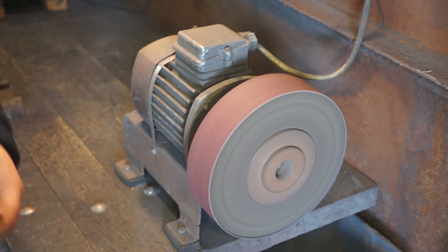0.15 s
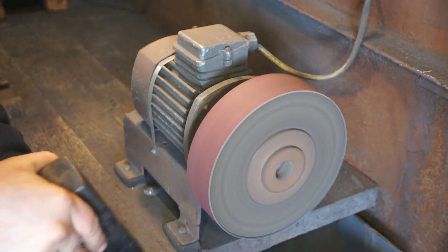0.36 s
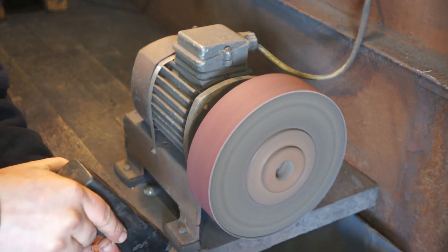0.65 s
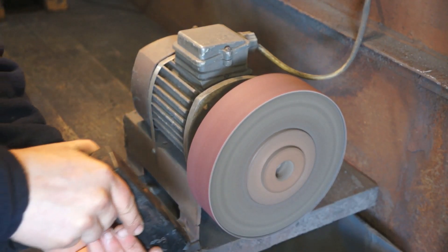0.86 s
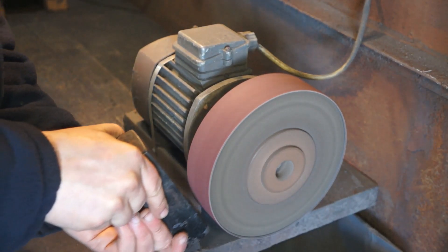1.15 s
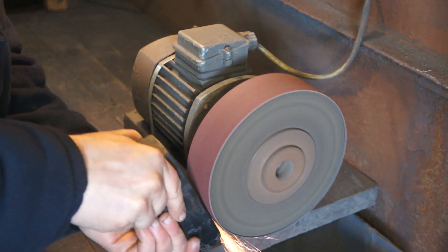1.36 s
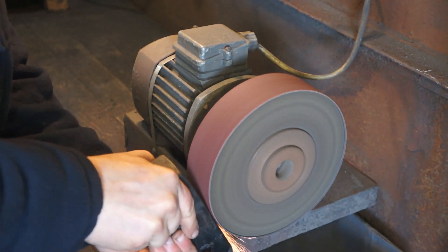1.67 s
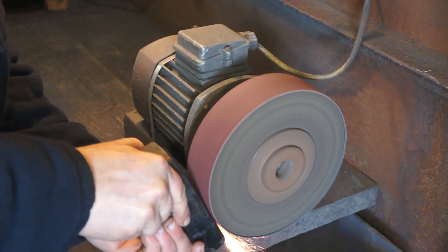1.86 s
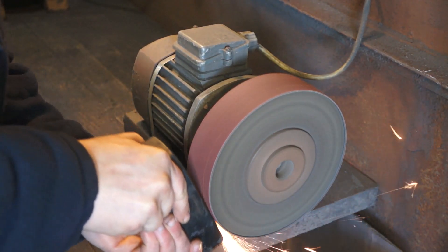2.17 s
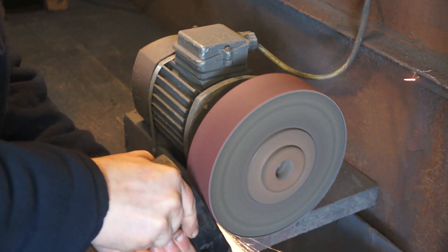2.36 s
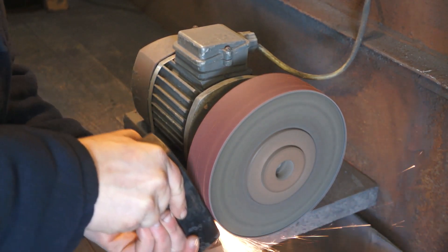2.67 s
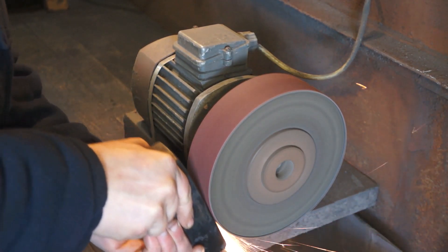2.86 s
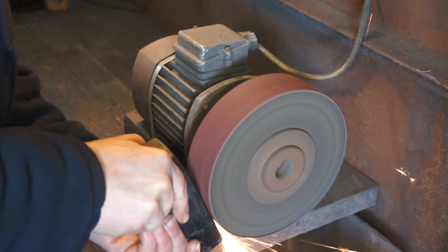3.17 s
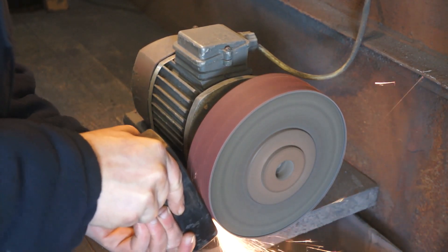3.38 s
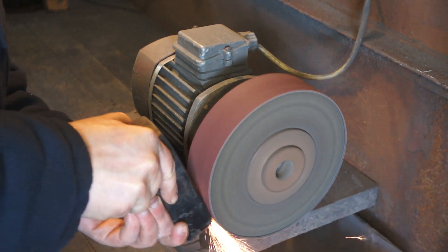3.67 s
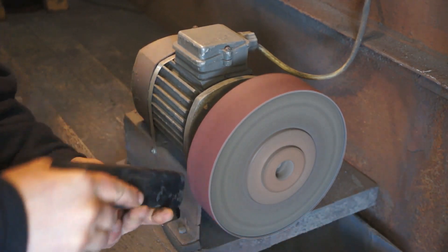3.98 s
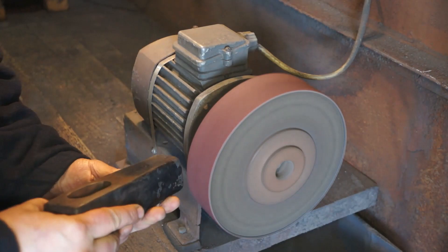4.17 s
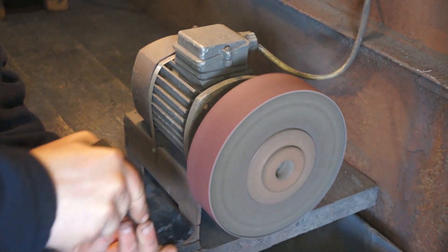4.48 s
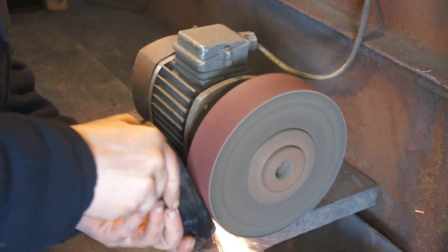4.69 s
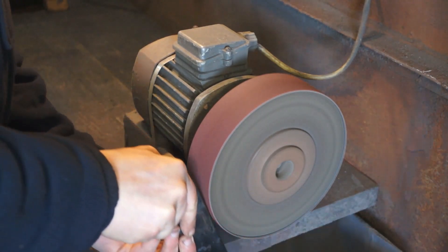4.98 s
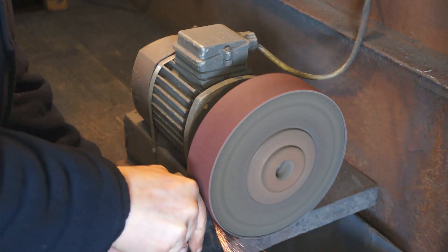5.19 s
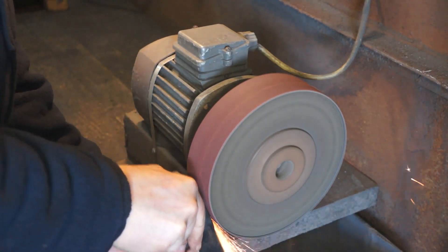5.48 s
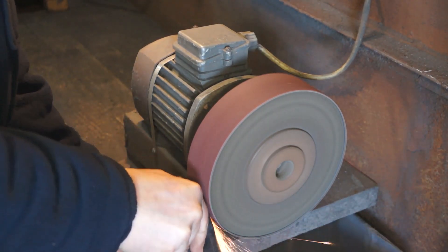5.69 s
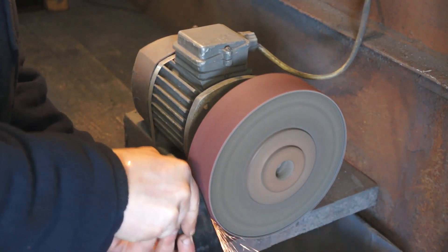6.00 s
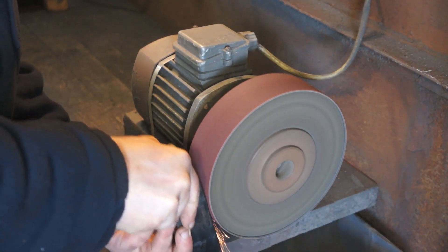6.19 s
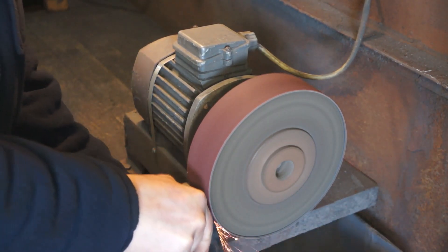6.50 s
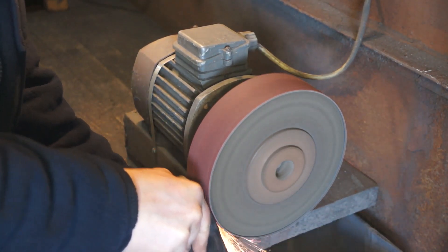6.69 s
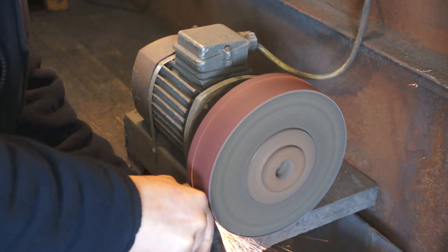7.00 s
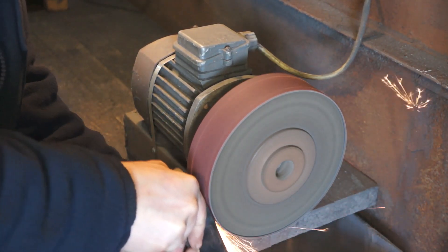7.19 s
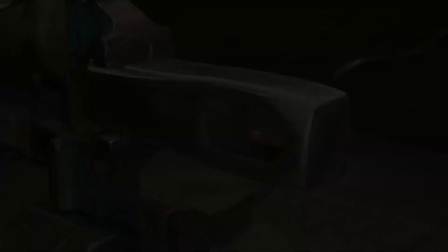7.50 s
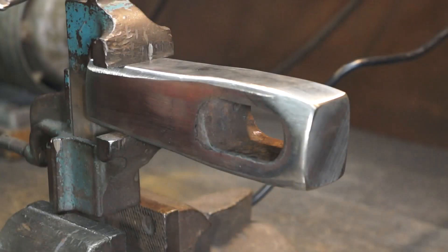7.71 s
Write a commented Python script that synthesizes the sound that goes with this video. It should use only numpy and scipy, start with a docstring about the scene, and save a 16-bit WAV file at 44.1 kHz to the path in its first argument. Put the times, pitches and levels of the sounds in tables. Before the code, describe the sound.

From 0 to 1.1 seconds an electric motor runs freely, close to the microphone: a steady low-mid hum, ball-bearing whine and rough housing rattle fluttering about fifty times a second. At 1.1 steel touches the spinning abrasive wheel, bouncing for a tenth of a second, then grinds until 3.67. The sound becomes a bright, dense hiss with metallic ringing around 4 to 7 kilohertz, gritty scrape, fine sharp ticks and a rapid buzz; pressure swells repeatedly and the motor slows slightly, mostly masked. The steel lifts, leaving the softer motor whir until 4.5. A second spell follows, less even, with short presses, lighter gaps around 5.2 to 6.8 and passing high squeals. A short, diffuse room tail surrounds the grinding. From 7.3 everything fades nearly to silence by 7.77, when a handheld die grinder abruptly chatters on steel, a fast, clicking, swelling rasp until the end at about 7.85.

```python
"""A workshop bench, close up: an electric motor spins an abrasive wheel, with a short echo on the grinding.
Shaft hum and ball-bearing whine are sines locked to the turning shaft; the housing rattle is filtered noise.
A steel block is pressed on the out-of-round wheel twice: noise pulsed once a turn rings the steel's modes.
That scene fades out and a handheld die grinder chatters on steel in a vice: decaying rings over a rasp."""
import sys
import numpy as np
from scipy import signal
from scipy.fft import rfft, irfft
from scipy.io import wavfile
from scipy.ndimage import uniform_filter1d

SR = 44100
rng = np.random.default_rng(int(sys.argv[2]) if len(sys.argv) > 2 else 0)


def waveform_to_disk(signal):
    """Save audio, clipped to [-1, 1], as 16-bit WAV at the path in sys.argv[1]."""
    frames = np.transpose(np.atleast_2d(signal))
    scaled = np.clip(frames, -1, 1) * 32767
    samples = np.round(scaled).astype(np.int16)
    wavfile.write(sys.argv[1], SR, samples)


def volts_from_decibels(level):
    """Turn decibel levels (scalar or array-like) into linear amplitude factors."""
    exponent = np.asarray(level, float) / 20
    return 10 ** exponent


N = 346185
TIME = np.arange(N) / SR
FREQ = np.fft.rfftfreq(N, 1 / SR)

# The two spells of steel on the wheel. Each row: from in seconds, to in seconds.
CONTACT_SPELLS = [(1.113, 3.67), (4.508, 7.77)]
# Stereo lean of the motor and the die grinder. Each row: frequency in Hz, left minus right in dB.
TOOL_LEAN = [(60, 3), (110, 0), (200, 1), (380, -1), (700, -1.5), (1290, -2), (2380, -4.5), (4400, -3),
             (8120, 2), (15000, 10)]


def curve(points, column=1):
    """One column of a table whose first column is time, sample by sample."""
    points = np.array(points)
    return np.interp(TIME, points[:, 0], points[:, column])


def shape(points):
    """Gain per frequency of (Hz, dB) points."""
    hz, db = np.transpose(points)
    return volts_from_decibels(np.interp(np.log(FREQ + 1), np.log(hz), db))


def modes(table, floor_db):
    """Response per frequency of resonances that ring on after the push, over a flat floor."""
    return volts_from_decibels(floor_db) + sum(volts_from_decibels(db) / (1 + 2j * (FREQ - hz) / width) for hz, width, db in table)


def above(hz, order):
    """Gain per frequency that keeps what lies above a corner."""
    return 1 / (1 + (hz / (FREQ + 1)) ** order)


def colour(x, gain):
    """Filter by a gain per frequency."""
    return irfft(rfft(x) * gain, N)


def unit(gain, lo_hz, hi_hz):
    """Scale a filter so that white noise leaves it with rms 1 between two frequencies."""
    inside = (FREQ > lo_hz) & (FREQ < hi_hz)
    return gain / np.sqrt(np.sum(np.abs(gain[inside]) ** 2) / len(FREQ))


def walk(rate):
    """Random levels drawn rate times a second and slewed by two running means."""
    k = int(SR / rate)
    held = np.repeat(rng.standard_normal(N // k + 1), k)
    return 1.07 * uniform_filter1d(uniform_filter1d(held, k), k)[:N]


def grains(scatter_db):
    """Noise whose samples differ widely in size, rms 1."""
    x = rng.standard_normal(N) * volts_from_decibels(scatter_db * rng.standard_normal(N))
    return x / x.std()


def pair(shared, apart, lean):
    """Two microphone ports: a common part, an unrelated part in opposite sign, a level tilt and a phase lead."""
    # Each row: frequency in Hz, gain of the unrelated part in dB.
    spread = [(60, -38), (300, -75), (1400, -7.5), (3100, -8.5), (6800, -3.5), (15000, -4.5)]
    # Each row: frequency in Hz, phase by which the left port leads in radians.
    left_lead = [(40, .1), (100, 0.2), (300, 0.25), (1200, 0.34), (3200, .1), (4600, 0.93), (6200, 0.47),
                 (8000, 1), (12000, 0.16), (16000, .1)]
    hz, radians = np.transpose(left_lead)
    lead = np.interp(np.log(FREQ + 1), np.log(hz), radians)
    side = colour(apart, shape(spread))
    tilt = np.sqrt(shape(lean)) * np.exp(.5j * lead)
    return np.array([colour(shared + side, tilt), colour(shared - side, 1 / tilt)])


def tones(multiples, dbs, turns, waver_db):
    """Sines locked to the shaft, wavering in level; the second row, for the side, is a quarter cycle off."""
    out = 0
    for m, db in zip(multiples, dbs):
        angle = 2 * np.pi * (m * turns + rng.random())
        sway = 0.65 * rng.standard_normal()
        level = np.sqrt(2) * volts_from_decibels(db + waver_db * walk(9))
        out = out + level * np.array([np.sin(angle), sway * np.cos(angle)])
    return out


def each_turn(turns, memory_turns):
    """Noise tied to the shaft angle: it comes round again and changes only over several turns."""
    keep = np.exp(-1 / memory_turns)
    fresh = rng.standard_normal((450, 900))  # turns by steps of angle
    rims = signal.lfilter([np.sqrt(1 - keep ** 2)], [1, -keep], fresh, axis=0)
    return rims[turns.astype(int) + 50, (turns % 1 * 900).astype(int)]  # skip the first 50 while they settle


def motor(turns):
    """Shaft hum, bearing whine at ball-pass multiples, and the housing, shaken hardest once a turn."""
    # Levels, which drop when the steel first bites, the hum most.
    # Each row: time in seconds, gain on hum and whine in dB, housing rattle in dB.
    loudness = [(0, -0.5, -26), (1.112, 0, -26), (1.125, -19, -47), (1.16, -13.5, -38.5),
                (1.43, -38, -46.5), (2.2, -36, -42), (2.3, -40, -49), (2.8, -35, -43), (3.5, -39, -44),
                (3.6, -24, -39), (3.9, -14.5, -39.5), (4.51, -13, -39), (4.93, -35, -41.5),
                (5.16, -20.5, -40), (6.03, -27.5, -41), (6.2, -19, -38), (6.43, -35, -43.5),
                (6.77, -26, -37.5), (7.14, -17, -41), (7.77, -23, -38.5)]
    # Shaft hum. Each row: multiple of the turn rate, level in dB before the gain.
    shaft_orders = [(1.0, -55), (2.0, -54), (2.5, -70), (3.0, -55), (3.5, -62), (4.0, -46), (4.5, -62),
                    (5.0, -37), (5.5, -60), (6.0, -46), (6.5, -55), (7.0, -60), (7.5, -47), (8.0, -43),
                    (8.5, -48), (9.0, -46), (10.0, -54), (10.5, -57), (11.0, -51), (11.5, -53), (12.0, -45),
                    (12.5, -44), (13.0, -52), (14.0, -47), (14.5, -58), (15.0, -51), (16.0, -52),
                    (17.0, -52), (18.0, -45), (19.0, -40), (20.0, -44), (20.5, -46), (21.0, -40),
                    (22.0, -42)]
    # Bearing whine. Each row: multiple of the ball-pass rate, shaft sideband in turn rates,
    # cage sideband in cage rates, level in dB before the gain and the damping.
    bearing_lines = [(5, 1, 0, -45), (7, -1, 1, -44), (7, 0.5, 0, -46), (8, -1, 0, -40.5), (8, 1, 0, -64),
                     (9, -1, 0, -50), (9, 0, 0, -33.5), (10, -1, 0, -60), (10, 0, 0, -39.5),
                     (10, 0, 1, -53), (11, -1, 0, -54), (12, -1, 0, -39.5), (12, 0, 0, -43.5),
                     (13, -1, 0, -71), (13, 1, 0, -36), (14, -2, 0, -61), (14, -1, 0, -34.5),
                     (14, 0, 0, -39), (14, 2, 0, -68), (16, 0, 0, -40), (16, 0, 1, -50), (17, 1, 0, -46)]
    # Colour of the rattle. Each row: frequency in Hz, relative density in dB.
    housing_colour = [(24, -55), (40, -27), (147, -19.5), (337, -10.5), (733, -8), (1040, -1.5),
                      (1440, -5.5), (2000, -2.5), (2700, -9.5), (3400, -5), (4230, -12.5), (4380, -15),
                      (4900, -12.5), (7200, -21), (10200, -32.5), (15000, -52), (16200, -70)]
    # Resonances of the housing. Each row: frequency in Hz, width in Hz, relative level in dB.
    housing_rings = [(1074, 92, 6), (1248, 60, 5), (1704, 44, 6), (2478, 71, 4), (2936, 48, 2.5),
                     (3270, 270, -1.5), (4020, 57, -1)]
    ball_pass, cage_rate = 4.912, .386  # per turn of the shaft

    hum_db, rattle_db = curve(loudness, column=1), curve(loudness, column=2)
    multiple, shaft_db = np.transpose(shaft_orders)
    hum = tones(multiple, shaft_db, turns, waver_db=1.0)
    ball, shaft, cage, whine_db = np.transpose(bearing_lines)
    whine = tones(ball_pass * ball + shaft + cage_rate * cage, whine_db, turns, waver_db=3.5)
    # side load on the wheel seats the balls and damps their whine
    loaded = sum((TIME > start) & (TIME < end) for start, end in CONTACT_SPELLS)
    whine = whine * volts_from_decibels(-8 * loaded)

    shake = volts_from_decibels(6.5 * np.exp(-((turns - .12) % 1) / .35) + .8 * walk(40))
    shake = shake / np.sqrt(np.mean(shake ** 2))
    body = unit(shape(housing_colour) * modes(housing_rings, 0), 850, 1350)
    # loose parts knock in nearly the same way on every turn, in the common part only
    knocks = .5 * each_turn(turns, memory_turns=5.7)
    rattle = np.array([colour(shake * (grains(scatter_db=3.5) + k), body) for k in (knocks, 0)])
    shared, apart = volts_from_decibels(hum_db) * (hum + whine) + volts_from_decibels(rattle_db) * rattle
    return pair(shared, apart, TOOL_LEAN)


def pushes():
    """Each push rises, holds and eases off over a light contact: hiss dB, ring dB, bite depth and tilt dB."""
    # The hands lean the block into the wheel. Each row: start in seconds, hold in seconds, hiss power added
    # in dB, 4-7 kHz ring power added in dB, bite depth from 0 to 1, hiss above 10 kHz re below in dB.
    presses = [(1.089, 0.35, -26, -32, 0.64, 0.5), (1.47, 0.46, -27, -31.5, 0.64, 0),
               (1.948, 0.28, -28, -33, 0.74, 1), (2.247, 0.21, -26, -33, .55, -1),
               (2.487, 0.31, -27, -33, 0.7, -1), (2.857, 0.096, -26.5, -35.5, 0.64, -0.5),
               (3.01, 0.48, -27, -33, 0.56, -1), (3.5, 0.13, -26, -35.5, 0.4, -1.5),
               (4.473, 0.46, -26.5, -32.5, 0.57, -2.5), (5.137, 0.17, -28.5, -38.5, 0.84, -1),
               (5.416, 0.034, -31, -37.5, .45, 3), (5.574, 0.065, -27.5, -40, 1, 2),
               (5.845, 0.16, -25.5, -34.5, 0.53, 1), (6.04, 0.088, -26.5, -33, 0.74, -0.5),
               (6.331, 0.18, -28, -46, 1, 1.5), (6.658, 0.018, -37, -48, 0.7, 0),
               (6.843, 0.063, -29, -42, 0.93, -5), (7.132, 0.21, -25.5, -32.5, 0.53, -1),
               (7.42, 0.25, -25.5, -30.5, .4, -0.5)]
    lean_in_s, ease_off_s = 0.036, 0.097
    light_hiss_db, light_ring_db, light_depth, light_tilt_db = -34, -41.5, .45, 0.5

    hiss, ring = volts_from_decibels(2 * light_hiss_db), volts_from_decibels(2 * light_ring_db)  # powers
    bite, tilt = hiss * light_depth, hiss * light_tilt_db  # weighted by hiss power
    for s, hold, hiss_db, ring_db, depth, tilt_db in presses:
        full = s + lean_in_s
        end = full + hold
        lean = np.interp(TIME, [s, full, end, end + ease_off_s], [0, 1, 1, 0]) ** 2
        power = lean * volts_from_decibels(2 * hiss_db)
        hiss, ring = hiss + power, ring + lean * volts_from_decibels(2 * ring_db)
        bite, tilt = bite + power * depth, tilt + power * tilt_db
    return 10 * np.log10(hiss), 10 * np.log10(ring), bite / hiss, tilt / hiss


def singing(push):
    """Ringing modes swell and fade: the push is shifted down, smoothed to a mode's width and shifted back."""
    # One mode sings out as the grip shifts. Each row: start in seconds, length in seconds, from in Hz,
    # to in Hz, level in dB relative to the hiss.
    sung_modes = [(1.35, 0.47, 5700, 5700, -18), (1.42, 0.21, 6500, 6470, -16),
                  (1.85, 0.16, 7170, 7170, -19), (2.25, .45, 5830, 5830, -17), (2.6, .36, 5170, 5280, -17),
                  (2.88, 0.33, 5320, 5050, -12), (3.16, 0.34, 5000, 4830, -16),
                  (3.2, 0.32, 10000, 9850, -13), (4.56, 0.29, 5540, 5520, -14),
                  (4.58, 0.26, 5850, 5770, -18), (4.72, 0.26, 6370, 6470, -13),
                  (5.163, 0.16, 9850, 9900, -11), (5.88, .35, 5900, 5960, -20),
                  (6.08, .16, 8100, 8200, -15), (6.32, .073, 8400, 8480, -6),
                  (6.36, 0.23, 10000, 10000, -10), (6.85, 0.17, 9320, 8900, -3.5)]
    out = np.zeros(N)
    for s, length, from_hz, to_hz, db in sung_modes:
        a, n = int(s * SR), int(length * SR)
        carrier = np.exp(2j * np.pi * np.cumsum(np.linspace(from_hz, to_hz, n)) / SR)
        keep = np.exp(-np.pi * 100 / SR)  # a width of 100 Hz
        ring = signal.lfilter([np.sqrt(2 - 2 * keep ** 2)], [1, -keep], push[a:a + n] / carrier) * carrier
        out[a:a + n] += volts_from_decibels(db) * signal.windows.tukey(n, .6) * ring.real
    return out


def grinding(turns):
    """Grit tears at the steel, hardest where the wheel runs high; no two turns bite alike."""
    # Low grinding, one list a spell. Each row: time in seconds, scrape below 4 kHz in dB, thump gain in dB.
    low_levels = [
        [(1.11, -36, -53), (1.5, -43.5, -57), (1.7, -39, -54), (2.1, -34.5, -46.5), (2.33, -40.5, -52.5),
         (2.75, -32.5, -44.5), (2.93, -38, -47), (3.3, -33.5, -45.5), (3.67, -40, -50)],
        [(4.51, -37.5, -73), (4.85, -38, -60), (5.15, -34.5, -58), (5.8, -35, -52), (5.9, -31.5, -50),
         (6.05, -42.5, -62), (6.3, -34, -47), (6.45, -36.5, -56), (6.75, -33.5, -46.5), (7.2, -33.5, -49.5),
         (7.77, -35, -45)],
    ]
    # Colour of the grit, one list a spell. Each row: frequency in Hz, relative density in dB.
    grit_colours = [
        [(180, -71), (300, -58), (378, -23), (493, -23.5), (797, -15.5), (925, -4), (1400, -14.5), (1710, -8.5),
         (3600, -6), (5620, -1.5), (7580, -0.5), (8650, 5.5), (11500, -4), (15700, -18)],
        [(180, -43), (300, -53), (592, -8), (824, -20), (895, -5), (1070, -3.5), (1450, -5), (1650, -3),
         (2260, -4.5), (3000, -3), (4040, -3), (9550, -1.5), (12000, -9), (15700, -16.5)],
    ]
    # The wheel's high spot thumps block and bench once a turn, one list a spell.
    # Each row: multiple of the turn rate, level in dB before the thump gain.
    thump_orders = [
        [(1, -47), (2, -29), (3, -30), (4, -32), (5, -25), (6, -28), (7, -23), (8, -19), (9, -21), (10, -27),
         (11, -24), (12, -16), (13, -13), (14, -12), (15, -16), (16, -14), (17, -18), (18, -8), (19, -11),
         (20, 0), (21, -8), (22, -4), (23, -7), (24, -11)],
        [(1, -30), (2, -27), (3, -25), (4, -16), (5, -16), (6, -23), (7, -21), (8, -13), (9, -17), (10, -14),
         (11, -14), (12, -11), (13, -13), (14, -15), (15, -9), (16, -13), (17, -14), (18, -3), (19, -7),
         (20, -2), (21, -8), (22, 0), (23, -4), (24, -7)],
    ]
    # Modes of the steel block. Each row: frequency in Hz, width in Hz, relative level in dB.
    block_modes = [(1573, 30, 0), (2938, 40, -1), (3344, 210, -5), (3850, 12, 6), (4360, 100, -3.5),
                   (4920, 130, 0), (5300, 62, 0), (5475, 18, 9), (5830, 160, 3), (6350, 47, 6.5),
                   (6954, 74, 6.5), (8400, 63, -6), (9100, 75, -23), (9660, 220, -4)]
    # The block bounces on the wheel as it meets or leaves it, and twice in mid-spell. Each row: start in
    # seconds, length in seconds, change of force in dB.
    bounces = [(1.126, .004, -4), (1.139, 0.03, -14), (1.165, 0.0066, 9), (1.178, .009, -3),
               (1.208, 0.0058, 10), (1.219, 0.011, -11), (3.615, .01, -4), (3.635, 0.015, -22),
               (3.653, 0.007, 3), (4.523, 0.019, -18), (4.539, .005, -1), (4.564, 0.014, -20),
               (5.581, .02, -5.5), (5.849, 0.024, -3)]
    # Stereo lean of the steel. Each row: frequency in Hz, left minus right in dB.
    block_lean = [(60, 2), (110, 1), (200, -8), (380, 2), (700, 0), (1290, -3), (2380, -0.5), (4400, -5),
                  (8120, 4.5), (15000, 7.5)]
    firm_hiss_db, chip_db = -26, -40  # gain on the chips when the hiss is at its firm level
    chip_follow = .4  # share of the hiss swell in dB that the chips follow
    chip_decay_turns = .3

    out = 0
    low = 1 / (1 + (FREQ / 4100) ** 8)
    top, upper = above(7250, 12), above(10000, 12)
    # the same grains come round each turn, so part of the scrape repeats
    rim = each_turn(turns, memory_turns=7.9)
    hiss_db, ring_db, depth, tilt_db = pushes()
    spells = zip(low_levels, grit_colours, thump_orders, CONTACT_SPELLS)
    for rows, grit_colour, orders, (start, end) in spells:
        scrape_db, thump_db = curve(rows, column=1), curve(rows, column=2)
        touching = (TIME > start) & (TIME < end)

        # contact is firm for half a turn and light for the rest
        high_spot = np.tanh(1.88 * np.cos(2 * np.pi * (turns - .03)) + .5 * walk(60))
        bite_db = 8 * depth * high_spot + 0.65 * walk(50) + 0.59 * walk(200)
        # level out the mean power, so that depth alone sets the throb
        force = touching * volts_from_decibels(bite_db) / np.sqrt(uniform_filter1d(volts_from_decibels(2 * bite_db), SR // 16))
        for s, length, db in bounces:
            force = force * volts_from_decibels(db * ((TIME > s) & (TIME < s + length)))

        # scrape, ring, hiss and upper hiss: filter, level in dB, exponent on the force
        # harder pressure shifts the balance between them
        body = shape(grit_colour) * modes(block_modes, 3.0)
        bands = [
            (unit(body * low, 1100, 4800), scrape_db + 1.3 * walk(10), .6),
            (unit(body * (1 - low) * (1 - top), 3600, 7900), ring_db + 1.2 * walk(10), 1),
            (unit(body * top, 6100, 15400) * (1 - upper), hiss_db - 2.0 + 0.68 * walk(10), 1),
            (unit(body * top, 6700, 15400) * upper, hiss_db - 2.0 + tilt_db + .8 * walk(10), 1)]
        steel = []
        for grit in (grains(scatter_db=3.5) + 0.41 * rim, grains(scatter_db=2.5)):  # shared, apart
            layer = volts_from_decibels(hiss_db) * singing(force * grit)
            for gain, db, throb in bands:
                layer = layer + volts_from_decibels(db) * colour(force ** throb * grit, gain)
            steel.append(layer)
        steel = np.array(steel)

        # hot chips tear off as lone, sharp ticks, thickest as the high spot arrives
        burst = force * (0.36 + np.exp(-((turns - .8) % 1) / chip_decay_turns))
        chip_colour = unit(shape(grit_colour) * above(10500, 6), 7500, 16000)
        chips = colour(burst * grains(scatter_db=8), chip_colour)
        steel[0] += volts_from_decibels(chip_db + chip_follow * (hiss_db - firm_hiss_db)) * chips

        multiple, order_db = np.arange(len(orders)) + 1, np.array(orders)[:, 1]
        bench = touching * volts_from_decibels(thump_db) * tones(multiple, order_db, turns, waver_db=4.0)
        shared, apart = steel + bench
        out = out + pair(shared, apart, block_lean)
    return out


def shop(dry):
    """Walls and floor return a short, diffuse tail, different at each port."""
    t60_s, level_db = 0.18, -5.5
    t = TIME[:SR // 2]
    tail = rng.standard_normal((2, len(t))) * volts_from_decibels(-60 * t / t60_s) * (t > .004)
    tail = tail / np.sqrt(np.sum(tail ** 2, axis=1, keepdims=True))
    middle = dry.mean(axis=0, keepdims=True)
    return volts_from_decibels(level_db) * signal.fftconvolve(middle, tail, axes=1)[:, :N]


def die_grinder():
    """The burr knocks the steel about a hundred times a second over a swelling rasp."""
    # Burr blows. Each row: start in seconds, level in dB, ring in Hz, rise in seconds.
    blows = [(7.7735, -30, 6460, .0009), (7.7822, -22, 1700, .0005), (7.7822, -29, 760, .0016),
             (7.803, -29, 5100, .0007), (7.8132, -26, 4860, .0005), (7.8235, -23, 5200, .0006),
             (7.8335, -22, 6900, .0006), (7.845, -33, 5000, .0005)]
    # Colour of the rasp. Each row: frequency in Hz, relative density in dB.
    rasp_colour = [(120, -77), (200, -50), (491, -6.5), (836, -8.5), (1870, -7), (2050, -8), (2910, -3),
                   (3900, -11), (5040, -5), (16000, -30)]
    # Swell of the rasp. Each row: time in seconds, level in dB.
    swell = [(7.772, -57), (7.785, -35), (7.82, -33.5), (7.85, -32)]

    rasp = unit(shape(rasp_colour), 200, 16000)
    level = volts_from_decibels(curve(swell)) * (TIME > swell[0][0])
    shared, apart = (level * colour(grains(scatter_db=2.5), rasp) for _ in range(2))
    crack = colour(rng.standard_normal(N), rasp)
    for s, db, hz, rise in blows:
        age = np.clip(TIME - s, 0, None) / rise
        envelope = np.e * age * np.exp(-age)  # reaches 1 after the rise time, then dies away
        shared = shared + volts_from_decibels(db) * envelope * (np.sin(2 * np.pi * hz * (TIME - s)) + 0.25 * crack)
    return pair(shared, apart, TOOL_LEAN)


def scene():
    """Motor and grinding with its echo fade out, then the die grinder."""
    # Shaft speed; the wheel slows under load. Each row: time in seconds, turns per second.
    shaft_speed = [(0, 49.74), (1.12, 49.74), (1.3, 48.97), (1.8, 48.03), (2.3, 47.4), (2.9, 47.22),
                   (3.6, 46.67), (3.8, 49.75), (4.53, 49.75), (4.75, 48.0), (5.2, 49.7), (5.6, 48.62),
                   (6.1, 49.1), (6.6, 48.8), (7.15, 48.23), (7.35, 49.08), (7.85, 48.62)]
    # Start and end of the fade in seconds.
    fade_span = (7.28, 7.775)
    turns = .47 + np.cumsum(curve(shaft_speed)) / SR  # shaft angle in turns
    steel = grinding(turns)
    fade = np.interp(TIME, fade_span, [1, 0]) ** 1.24
    return fade * (motor(turns) + steel + shop(steel)) + die_grinder()


def band_limit(x):
    """A steep low-pass at the top of the band."""
    return signal.sosfilt(signal.butter(12, 16320, fs=SR, output="sos"), x)


def record(dry):
    """A small camera cuts the top, steeply above 15.95 kHz."""
    cut = signal.ellip(10, .2, 60, 15950, fs=SR, output="sos")
    mix = signal.sosfilt(cut, dry)
    return band_limit(mix)


dry = scene()
out = record(dry)
waveform_to_disk(out)
```